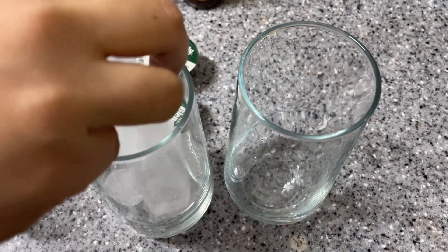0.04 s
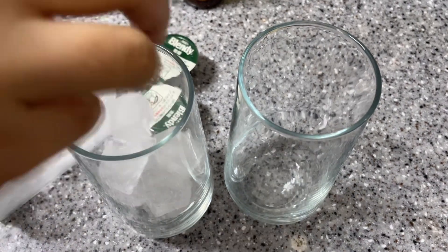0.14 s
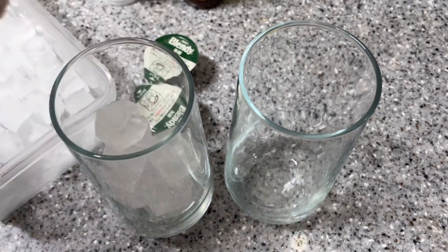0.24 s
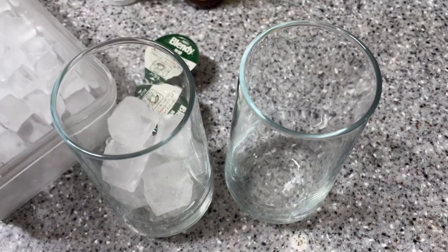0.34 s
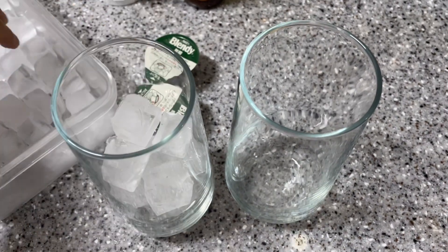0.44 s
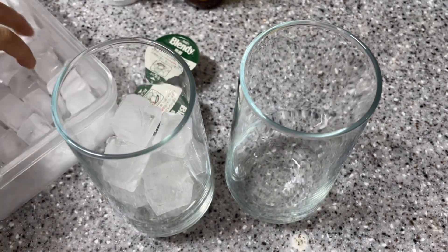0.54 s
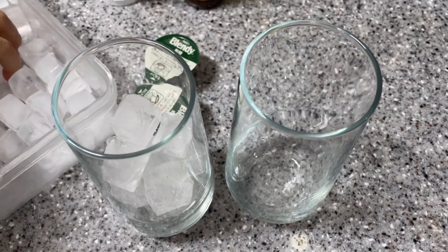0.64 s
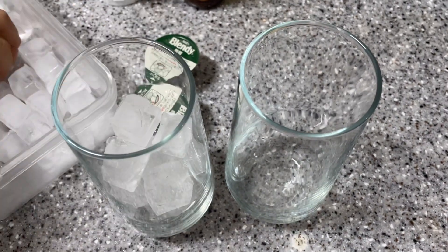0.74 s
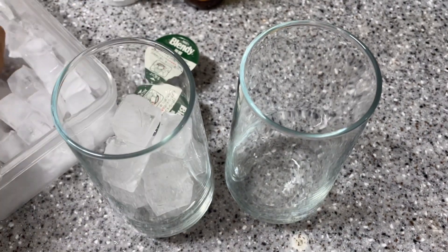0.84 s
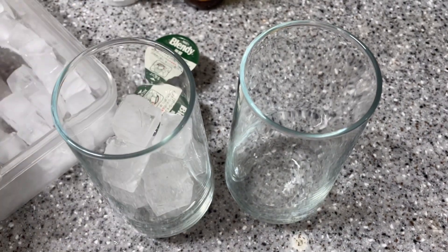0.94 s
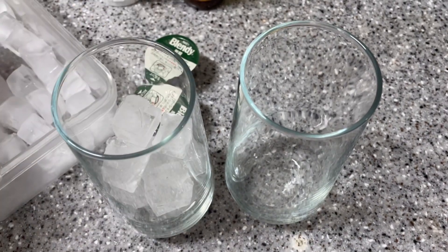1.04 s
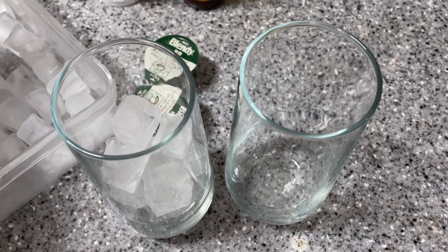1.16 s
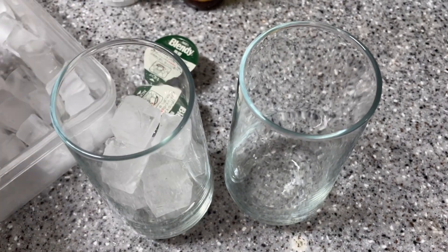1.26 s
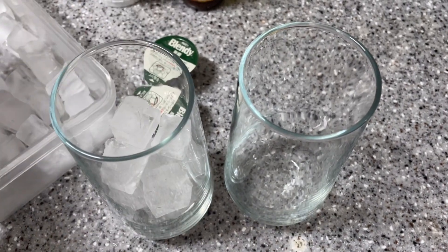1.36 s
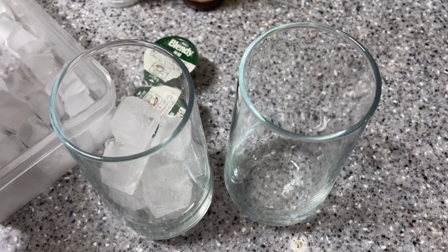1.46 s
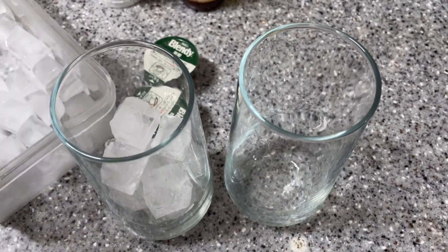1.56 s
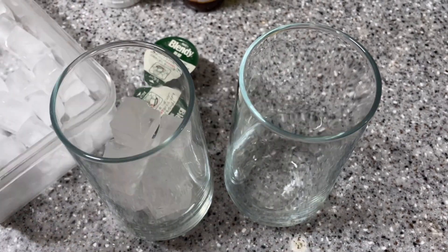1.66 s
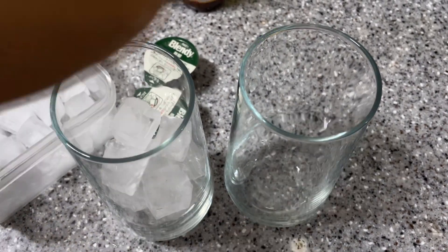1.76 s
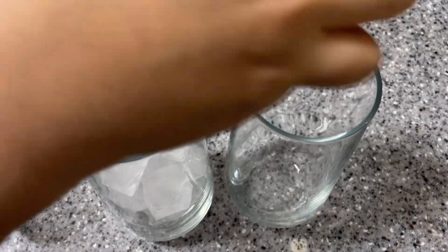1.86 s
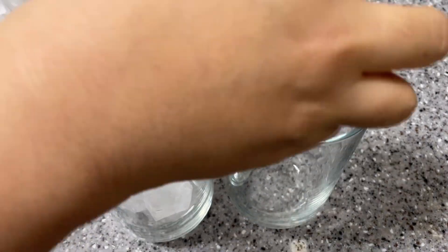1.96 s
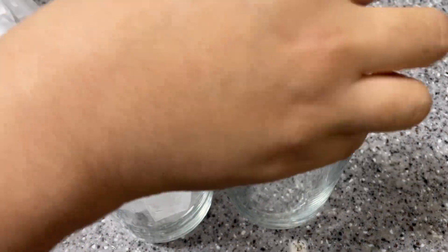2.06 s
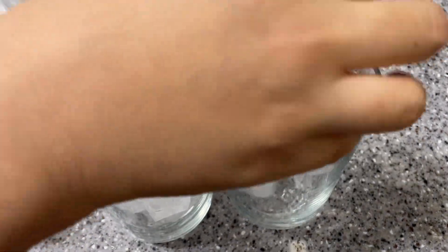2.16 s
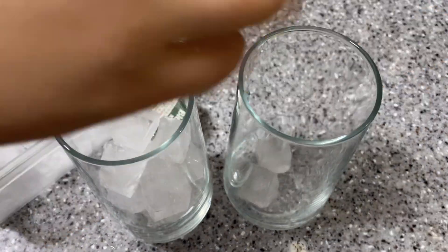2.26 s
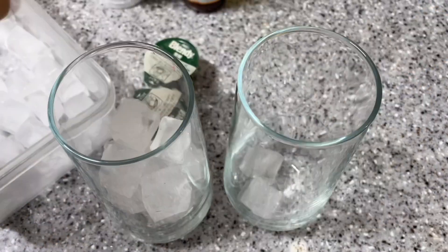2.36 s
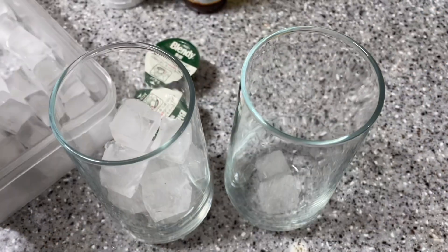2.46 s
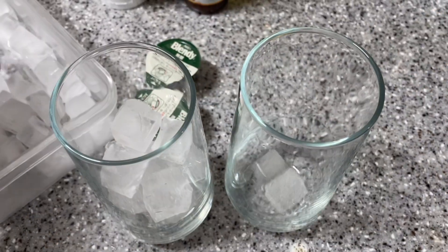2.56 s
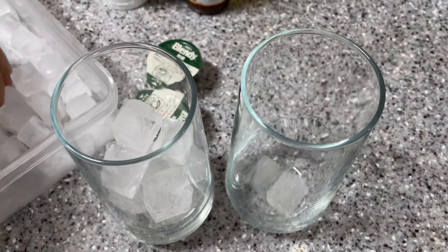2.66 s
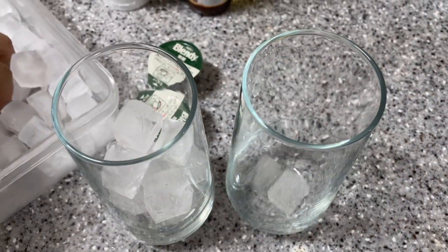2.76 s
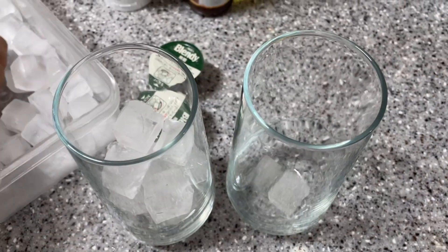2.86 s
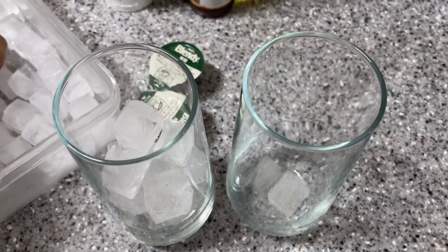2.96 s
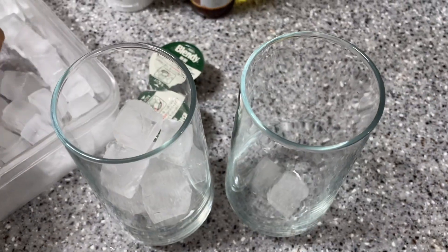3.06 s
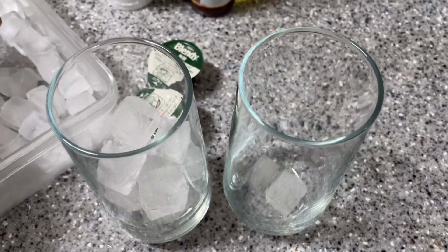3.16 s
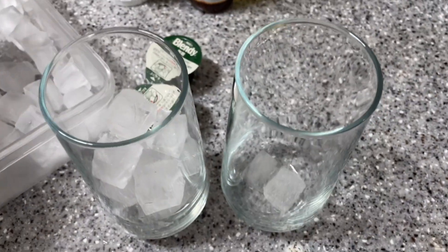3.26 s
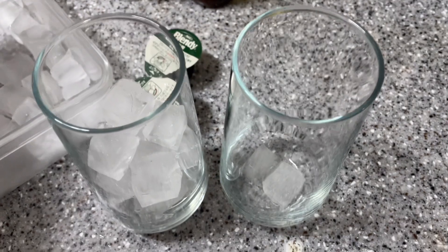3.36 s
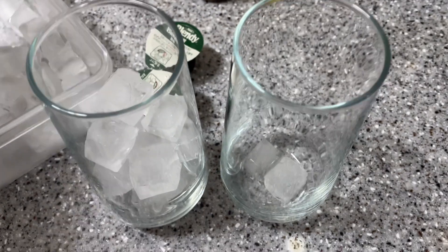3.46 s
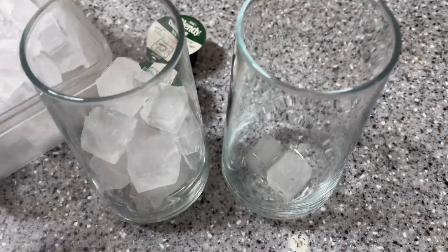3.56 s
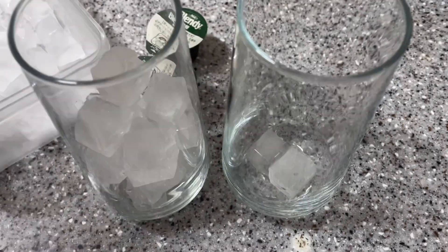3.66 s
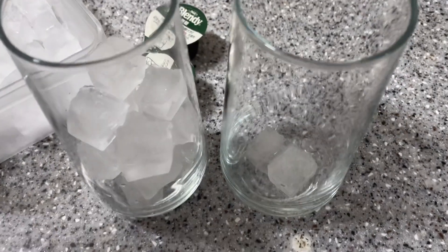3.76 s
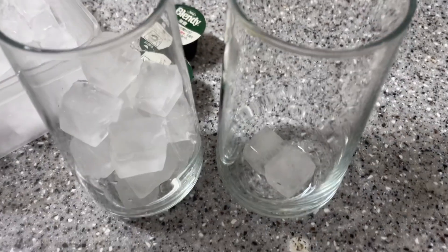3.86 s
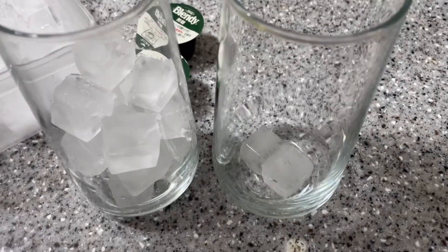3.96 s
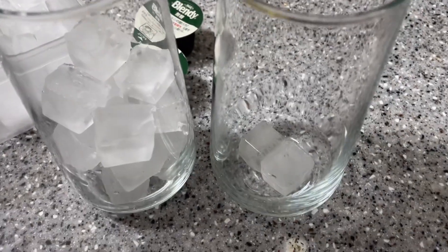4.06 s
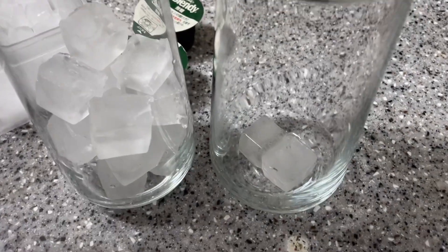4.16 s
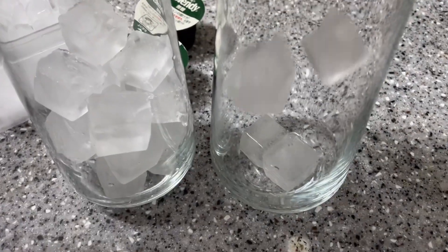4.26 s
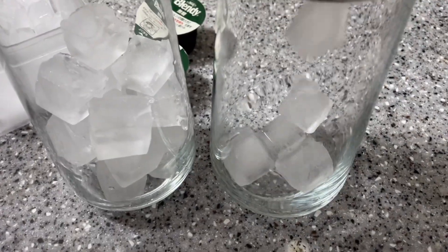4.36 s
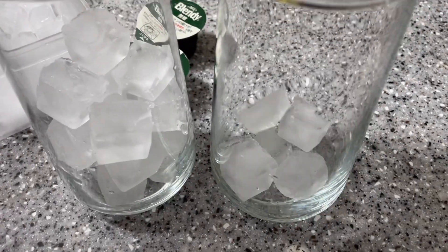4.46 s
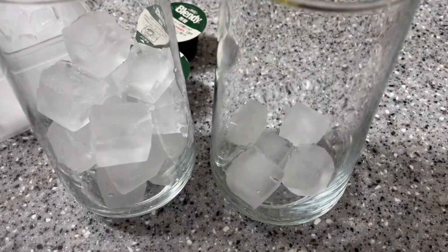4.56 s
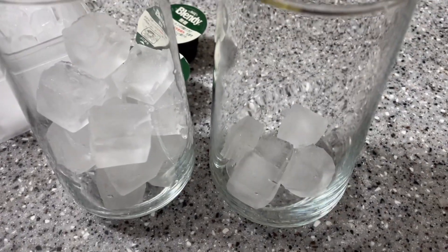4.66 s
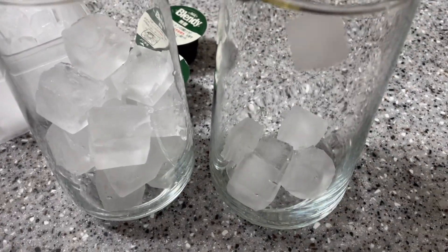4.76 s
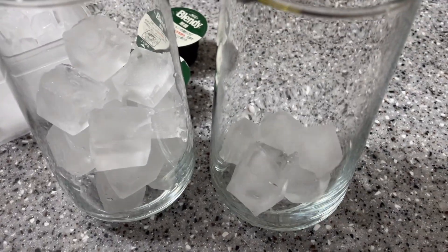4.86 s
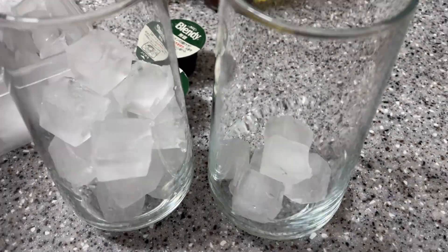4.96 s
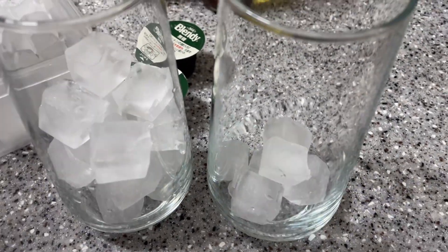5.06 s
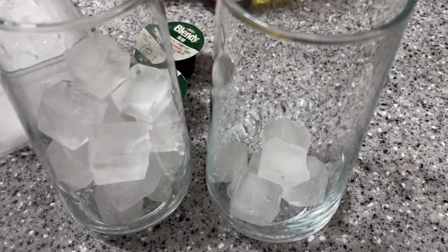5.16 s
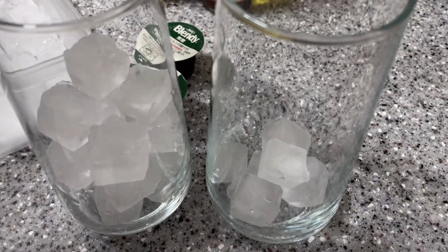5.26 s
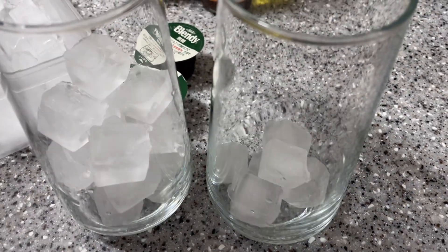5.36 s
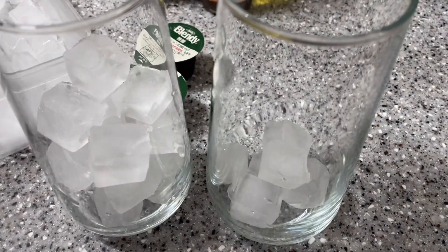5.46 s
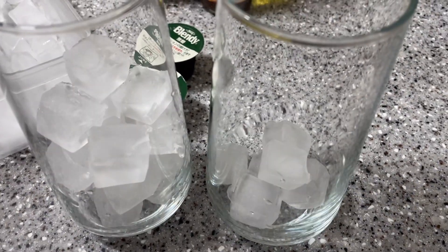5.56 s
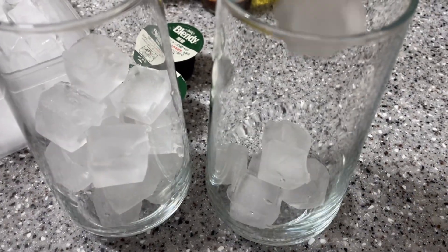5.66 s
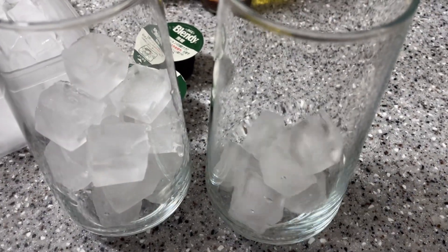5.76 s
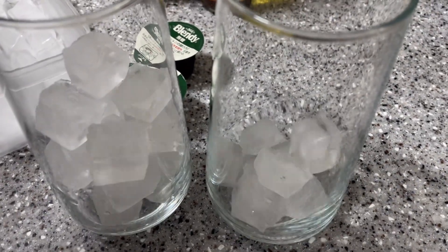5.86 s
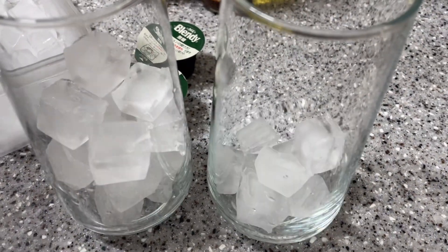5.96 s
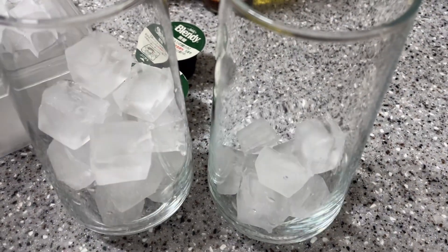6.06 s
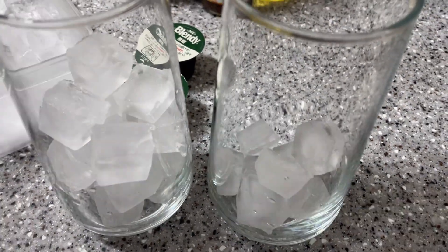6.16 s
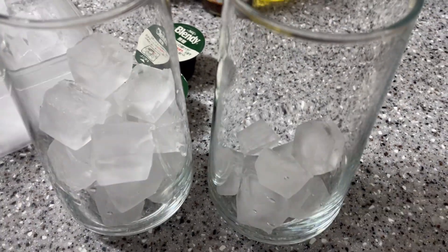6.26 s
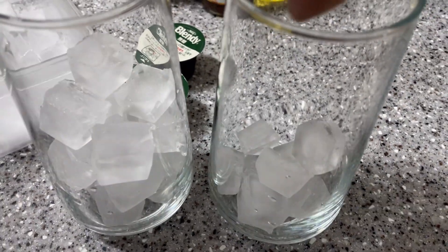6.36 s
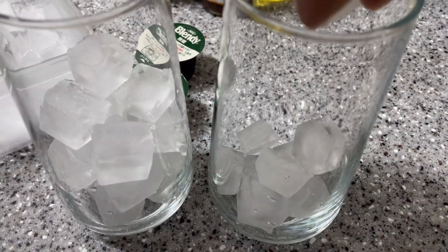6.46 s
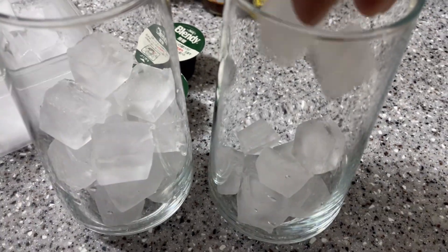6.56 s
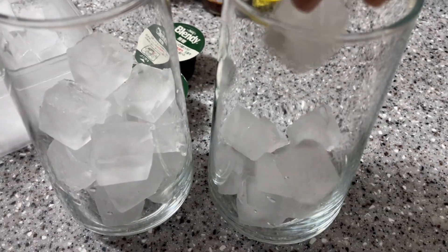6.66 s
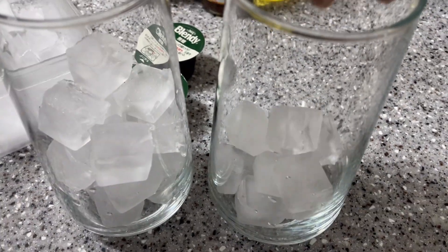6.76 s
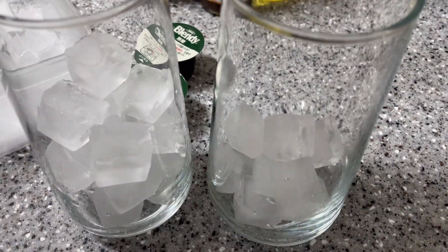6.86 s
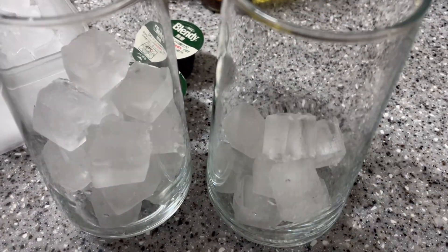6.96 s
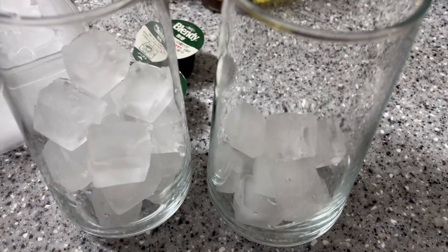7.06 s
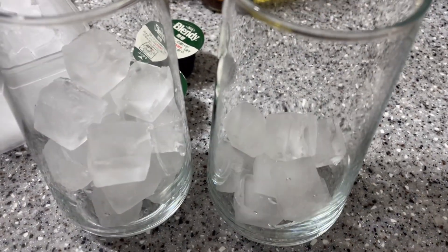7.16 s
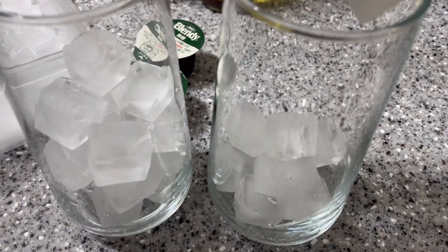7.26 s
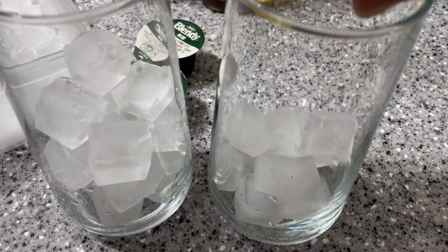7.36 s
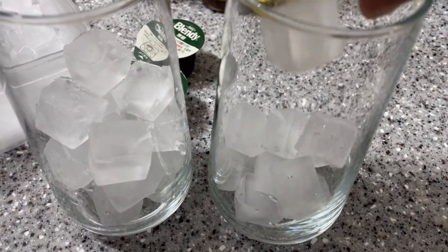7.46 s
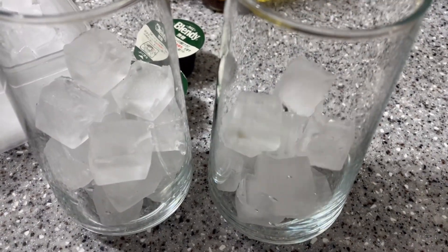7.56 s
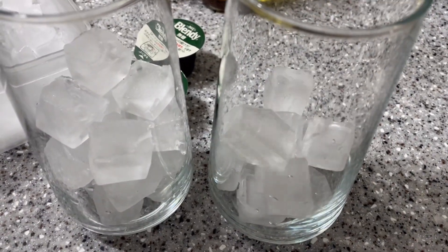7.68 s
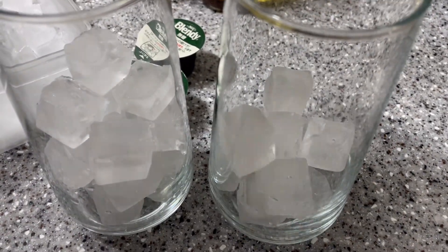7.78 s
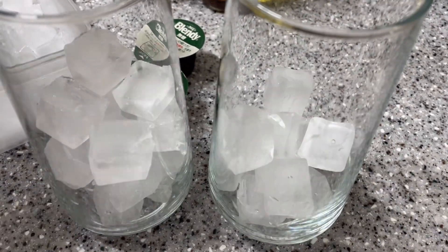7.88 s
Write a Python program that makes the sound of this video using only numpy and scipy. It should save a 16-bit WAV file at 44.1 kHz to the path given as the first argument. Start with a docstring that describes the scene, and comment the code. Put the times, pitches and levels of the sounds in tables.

```python
"""Ice cubes drop into a tall drinking glass on a stone counter, over a kitchen rush and hum.
A hand then digs cubes out of a plastic tub, and later handfuls fall into a second, right glass.
Knocks are decaying filtered noise, glass rings are sums of damped sine modes, and stirring is dense random ticks.
Reflections are added, and a close two-port microphone turns the phase between its ports."""
import sys
import numpy as np
from scipy import signal
from scipy.fft import rfft, irfft, next_fast_len
from scipy.io import wavfile
from scipy.ndimage import uniform_filter1d

SR = 44100
rng = np.random.default_rng(int(sys.argv[2]) if len(sys.argv) > 2 else 0)


def digitize_waveform(pressure):
    """Quantize a signal to 16-bit integers and store it at the path in sys.argv[1].

    Rows of a 2-D input are taken as channels; values are limited to [-1, 1].
    """
    field = np.atleast_2d(pressure).T
    bounded = np.clip(field, -1, 1)
    quanta = np.round(bounded * 32767).astype(np.int16)
    wavfile.write(sys.argv[1], SR, quanta)


N = 349272  # samples


def amp(db):
    """Decibel law: level in dB to amplitude gain."""
    return 10 ** (np.asarray(db) / 20)


def evened(x):
    """Power normalization: scales to rms 1."""
    return x / np.sqrt(np.mean(x ** 2) + 1e-20)


def smoothed(x, width, axis=-1):
    """Low-pass smoothing: two running means in a row."""
    return uniform_filter1d(uniform_filter1d(x, width, axis), width, axis)


def read(points, hz):
    """Spectral interpolation: reads a table on a log-frequency axis."""
    f, value = np.transpose(points)
    return np.interp(np.log(hz + 1), np.log(f + 1), value)


def at_time(points, s):
    """Linear interpolation: reads a table on a time axis."""
    return np.interp(s, *np.transpose(points))


def add(mix, s, sound):
    """Superposition: mixes a sound in at second s."""
    part = mix[:, round(s * SR):][:, :sound.shape[1]]
    part += sound[:, :part.shape[1]]


# background spectrum before levelling: (frequency [Hz], relative density [dB per Hz])
KITCHEN_SPECTRUM = [(25, -8), (42, -2), (60, 3), (72, 1.5), (100, -2.5), (250, -4.5), (600, -7),
                    (800, -8.5), (1200, -20), (2000, -24), (4300, -25), (5000, -29), (8000, -38),
                    (12000, -44.5), (13300, -51), (15500, -47)]
RUSH_DB, HUM_HZ, HUM_DB = -43.5, 119.4, -51.5  # rms of the rush; middle rms of the hum


def kitchen():
    """Broadband noise and a tone: appliance rush with drifting patches on two paths, and a wavering mains hum."""
    frames, hz = N // 256 + 5, np.fft.rfftfreq(1024, 1 / SR)
    a, b, c, d, patches = rng.standard_normal((frames, 513, 5)).T
    patches = uniform_filter1d(uniform_filter1d(patches, 10, 0), 16, 1)  # across frequency, then time
    colour_db = read(KITCHEN_SPECTRUM, hz)[:, None] + 2.9 * evened(patches)
    z = np.array([a + 1j * b, c + 1j * d]) * amp(colour_db)
    rush = amp(RUSH_DB) * evened(signal.istft(z, nperseg=1024, noverlap=768)[1][:, :N])
    waver = evened(smoothed(rng.standard_normal(N), 2500))
    hum = np.sqrt(2) * np.sin(2 * np.pi * HUM_HZ * np.arange(N) / SR)
    return rush + amp(HUM_DB + 3.7 * waver) * hum


# decay of the reflections: (frequency [Hz], t60 [s])
ROOM_DECAY = [(300, 0.1), (2000, 0.21), (6000, 0.15), (14000, 0.12)]


def room(x):
    """Reverberation: sparse reflections of random sign, each band dying at its own speed."""
    taps = np.zeros((2, SR // 2))
    slots = np.arange(200, SR // 2 - 20, 20)
    at = slots + rng.integers(0, 20, (2, len(slots)))
    np.put_along_axis(taps, at, rng.choice([-1., 1.], at.shape), 1)
    hz, t, z = signal.stft(taps, SR, nperseg=256)
    decay = amp(-60 * t / read(ROOM_DECAY, hz)[:, None])
    tail = signal.istft(z * decay, SR, nperseg=256)[1]
    return signal.fftconvolve(x[None], tail / np.linalg.norm(tail[0]), axes=1)[:, :N]


def burst(spectrum, t60, tilt_db=0., rise=0.0006, crack_db=-8.5, size=4096):
    """Damped impact noise: a coloured puff for each of two paths, with a bright crack; treble dies sooner than bass."""
    hz, t = np.fft.rfftfreq(size, 1 / SR), np.arange(size) / SR
    lumps = evened(smoothed(rng.standard_normal(len(hz)), 30))  # each burst has its own colour
    colour_db = read(spectrum, hz) + tilt_db * np.log2((hz + 50) / 3000) + 3.92 * lumps
    z = rfft(rng.standard_normal((2, size))) * amp(colour_db)
    low = 1 / (1 + (hz / 1500) ** 2)
    high = 1 / (1 + (7000 / (hz + 1)) ** 4)
    t60 = max(t60, .004)
    puff = irfft(z * low) * amp(-60 * t / (3.64 * t60))  # the bass lasts longer
    puff += irfft(z * (1 - low)) * amp(-60 * t / t60)
    puff += irfft(z * high) * amp(crack_db - 60 * t / 0.005)
    onset = 1 - np.exp(-t / max(rise, 1e-4))
    return puff * onset / (2.35 * np.std(irfft(z)))


# colour of the plastic tub, for stirring and clacks: (frequency [Hz], relative level [dB])
TUB_SPECTRUM = [(90, -38), (200, -46), (500, -11), (1200, -2.5), (2100, -3.5), (4100, -6.5), (6000, -15.5),
                (8000, -20), (11000, -25.5), (13200, -31.5), (15500, -32)]
# the hand stirs the heap of cubes, one list a stir: (time [s], relative rattle level [dB])
STIR_LEVELS = [
    [(.497, -40), (.555, -19.5), (.58, -15), (.645, -18), (.67, -27), (.76, -29), (.84, -19), (.87, -26.5),
     (.975, -38), (1.03, -30.5), (1.09, -35.5), (1.15, -32), (1.24, -34.5), (1.29, -47.5), (1.46, -57)],
    [(2.56, -47.5), (2.69, -15.5), (2.73, -29), (2.81, -16), (2.86, -15.5), (2.92, -23), (3.0, -20),
     (3.03, -32), (3.16, -27.5), (3.2, -40), (3.26, -47.5), (3.37, -23.5), (3.42, -43), (3.47, -32.5),
     (3.52, -87)],
    [(5.25, -58.5), (5.28, -24.5), (5.41, -40), (5.45, -34), (5.51, -42.5), (5.56, -38), (5.7, -65)],
    [(6.12, -57), (6.17, -26.5), (6.22, -28.5), (6.3, -41.5), (6.45, -57.5)],
]


def rattle(rows, per_s=1200, spread_db=5.5):
    """Random impact train: many small ticks, each shaking one patch of the tub wall; harder stirring is brighter."""
    s, level_db = np.transpose(rows)
    t = np.arange(s[0], s[-1], 1 / SR)
    strength = amp(spread_db * np.minimum(rng.exponential(1, len(t)), 4))
    ticks = strength * (rng.random(len(t)) < per_s / SR)
    patch = rng.integers(0, 12, len(t))

    def shaken(tilt_db):
        """Convolution: each patch answers its own ticks."""
        parts = (signal.oaconvolve(ticks[None] * (patch == k), burst(TUB_SPECTRUM, 0.031, tilt_db), axes=1)
                 for k in range(12))
        return evened(sum(part[:, :len(t)] for part in parts))

    dull, bright = shaken(-0.6), shaken(3.5)
    level_db = np.interp(t, s, level_db)
    brightness = np.clip((level_db + 60.5) / 40, 0, 1)
    sound = np.sqrt(1 - brightness) * dull + np.sqrt(brightness) * bright
    return amp(level_db) * sound * signal.windows.tukey(len(t), .01)


# single cubes clacking in the tub: (time [s], relative level [dB])
CLACK_HITS = [(0.5041, -13), (0.5863, -4.5), (.609, -5.5), (0.7768, -9.5), (0.8032, -24), (0.8374, 4),
              (0.888, -6), (0.9852, -14), (1.0154, -7.5), (1.1147, -10.5), (1.128, -5), (1.1575, -3.5),
              (1.2165, -12), (2.5992, -18), (2.6821, -11), (2.7767, -31), (2.8256, -3.5), (2.8882, -1.5),
              (3.0584, -9.5), (3.0988, -11.5), (3.1517, -11), (3.285, -24), (3.3191, -9.5), (3.3447, 1),
              (3.385, -4.5), (3.4283, -16.5), (3.4523, -8), (5.2719, 5), (5.3073, -8.5), (5.3203, -13.5),
              (5.374, -24), (5.432, -1), (5.4574, -26), (5.5249, -10), (5.5433, -11), (5.6175, -27.5),
              (6.1415, -12.5), (6.1696, 0.5), (6.1995, -4), (6.2394, -36), (6.2754, -18), (6.3607, -30)]
# brightness of the clacks: (time [s], spectral tilt [dB per octave])
CLACK_TILTS = [(.5, 4), (1.2, 3.5), (2.7, 2.5), (3.4, 4), (5.3, 4), (5.6, 4), (6.2, 3.5), (6.35, 12.5)]
CLACK_T60_S, SHARPER_DB_PER_DB = 0.04, 0.32  # t60 of a clack at 0 dB; harder clacks die sooner


def tub():
    """Impact excitation: stirring of the heap and single clacks."""
    out = np.zeros((2, N))
    for rows in STIR_LEVELS:
        add(out, rows[0][0], rattle(rows))
    for s, db in CLACK_HITS:
        t60 = CLACK_T60_S * amp(-SHARPER_DB_PER_DB * db)
        clack = burst(TUB_SPECTRUM, t60, at_time(CLACK_TILTS, s), rise=0.00067)
        add(out, s, amp(db) * clack)
    return out


def ring(modes, length=0.96, rise=.001, scatter_db=3.0):
    """Modal synthesis: damped sines on two paths, t60 scaled by length; random mode balance as the struck spot varies."""
    hz, mode_db, t60 = np.transpose(modes)[:, :, None]
    t60 = t60 * max(length, .05)
    t = np.arange(0, min(t60.max(), .7), 1 / SR)
    spot_db, start = scatter_db * rng.standard_normal(hz.shape), rng.random(hz.shape)
    start = start + np.array([0, 1 / 4])[:, None, None]  # the second path is a quarter turn apart in phase
    tones = amp(mode_db + spot_db - 60 * t / t60) * np.sin(2 * np.pi * (hz * t + start))
    onset = 1 - np.exp(-t / max(rise, 1e-4))
    return onset * tones.sum(1) / np.linalg.norm(amp(mode_db))


# heavy landings: (time [s], level [dB])
THUMP_HITS = [(2.141, -18.5), (2.217, -15.5), (2.285, -23.5), (4.309, -27), (5.727, -16.5), (6.621, -28),
              (6.729, -28), (7.355, -27), (7.514, -25), (7.596, -26)]
# modes of the counter and air column: (frequency [Hz], relative level [dB], t60 before the scaling in ring [s])
THUMP_MODES = [(568, 3, 0.23), (236, 1, 0.08), (341.4, 3, 0.028), (684, 4, 0.11), (925, -20.5, 0.028)]


def thumps():
    """Low-frequency resonance: heavy landings thump the counter and air column."""
    out = np.zeros((2, N))
    for s, db in THUMP_HITS:
        add(out, s, amp(db) * ring(THUMP_MODES, rise=0.0011))
    return out


# the ringing stops short: (time [s], level lost [dB]; negative rows have no effect)
HUSH_STEPS = [(0.202, 7.5), (2.284, -2), (2.501, -3), (4.309, 13.5), (4.991, 44.5), (6.621, 8.5),
              (6.81, 5.5), (7.355, 4), (7.406, 26), (7.62, 8)]


def hushes():
    """Cumulative attenuation: dB lost up to each sample."""
    lost_db = np.zeros(N + SR)
    for s, db in HUSH_STEPS:
        lost_db[round(s * SR):] += max(db, 0)
    return lost_db


def long_note(s, hz, db, t60, hushed_db):
    """Lightly damped resonance: one slow mode of the right glass, cut at 0.7 s at most, lowered only by a hush."""
    note, at = ring([(hz, 0, t60)], rise=0.0021, scatter_db=-0.5), round(s * SR)
    return note * amp(db + hushed_db[at] - hushed_db[at:at + note.shape[1]])


# blows that set the low rim note singing: (time [s], level [dB])
LOW_NOTE_HITS = [(4.159, -35.5), (4.36, -35), (4.817, -44), (5.749, -44), (6.539, -31), (6.634, -24.5),
                 (6.731, -31), (7.281, -33.5), (7.374, -30), (7.597, -28)]
# t60 before the scaling in ring; it shortens as the glass fills
LOW_HZ, LOW_T60_S, LOW_FREE_S, LOW_DAMP_DB_PER_S = 1283, 2.4, 4.8, 8.5


def low_notes(hushed_db):
    """Added damping: long rim notes of the right glass, not muted by a passing cube, shorter as cubes pile up."""
    out = np.zeros((2, N))
    for s, db in LOW_NOTE_HITS:
        t60 = LOW_T60_S * amp(-LOW_DAMP_DB_PER_S * max(s - LOW_FREE_S, 0))
        add(out, s, long_note(s, LOW_HZ, db, t60, hushed_db))
    return out


# level against the base modes, t60 before the scaling in ring; fainter as the glass fills
FOOT_HZ, FOOT_DB, FOOT_T60_S, FOOT_FREE_S, FOOT_LOSS_DB_PER_S = 2930, -14, 0.32, 1.8, 12


def foot(s, base_db, hushed_db):
    """Mode coupling: the foot of the right glass sounds with its base modes."""
    foot_db = base_db + FOOT_DB - FOOT_LOSS_DB_PER_S * max(s - FOOT_FREE_S, 0)
    return long_note(s, FOOT_HZ, foot_db, FOOT_T60_S, hushed_db)


# colour of the dry knock of ice: (frequency [Hz], relative level [dB])
ICE_SPECTRUM = [(120, -36), (300, -3.5), (800, -2.5), (1600, -1), (2600, -2.5), (5000, 2.5), (7500, -2),
                (11000, -15), (13500, -18.5), (15500, -24.5)]
KNOCK_TILT_DB, KNOCK_TILT_RISE_DB = -.5, 2  # dB an octave for a blow at the base, and gained up to the rim


def knock(height, rise):
    """Contact noise: a short ice burst, brighter for a blow nearer the rim."""
    tilt_db = KNOCK_TILT_DB + KNOCK_TILT_RISE_DB * height
    return burst(ICE_SPECTRUM, 0.033, tilt_db, rise=0.58 * rise, crack_db=-3.5)


def chatter(blow, chatter_db, chatter_s):
    """Repeated impact: eight small bounces follow a blow, fainter the later."""
    late, sign = rng.random(8), rng.choice([-1., 1.], 8)
    bounces = np.zeros(2048)
    at = np.minimum(late * chatter_s * SR, 2047).astype(int)
    bounces[at] = sign * amp(chatter_db - 18.7 * late)
    bounces[0] = 1  # the blow itself
    return signal.oaconvolve(blow, bounces[None] / np.linalg.norm(bounces), axes=1)[:, :SR // 2]


# cubes landing in a glass:
# (time [s], dry knock of ice [dB], ring of the wall [dB], height of the blow [0 base - 1 rim])
CUBE_DROPS = [(0.0399, -13, -17, 0.3), (0.0605, -2, -12, 0.44), (0.0888, -6.5, -8.5, 0.5),
              (0.1164, -3, -5, 0.28), (0.1243, -9, -0.5, 0.43), (0.1499, -12, -14, 0.44),
              (.1674, -39, -23, .7), (.1999, -16, -17, 0.46), (0.269, -34, -50, .1),
              (0.2859, -27, -61, 0.097), (.3077, -33, -59, 0.09), (0.3237, -24.5, -52, 0.41),
              (0.3358, -16.5, -16, 0.19), (.351, -24, -25, .3), (0.3567, -18, -13, 0.27),
              (2.133, -17, -35, .1), (2.141, 0, -17.5, 0.42), (2.1824, -12, -33, 0.71),
              (2.2161, -12, -32, 0.21), (2.2506, -16.5, -42, 0.23), (2.2867, -9.5, -33, 0.098),
              (2.319, -11.5, -47, 0.38), (2.34, -24, -33, 0.47), (2.362, -15.5, -49, .2),
              (2.4113, -18.5, -29.5, 0.23), (2.434, -21, -42, 0.25), (2.463, -12.5, -42, .4),
              (4.1601, -17, -8.5, 0.5), (4.2104, -23, -13, 0.68), (4.2814, -28, -42, 0.81),
              (4.3093, 0.5, -9.5, 0.55), (4.3188, -8, -5.5, 0.14), (4.3425, -21, -17.5, 0.5),
              (4.397, -20.5, -36, 0.36), (4.412, -15.5, -12, 0.23), (4.447, -24, -44, 0.34),
              (4.4846, -27, -33, 0.48), (4.5045, -17, -22, 0.42), (4.572, -24.5, -26, 0.22),
              (4.602, -23, -31, 0.07), (4.8167, -6, -8.5, 0.37), (4.8556, -14, -27, 0.16),
              (4.9043, -19, -27.5, 0.24), (4.9463, -15.5, -34, 0.35), (4.9601, -21, -20.5, 0.085),
              (4.9871, -16, -30, 0.06), (5.7268, -0.5, -17, 0.43), (5.749, -7.5, -9, 0.34),
              (5.8055, -27, -26, 0.11), (5.8374, -31, -24, 0.37), (5.8898, -31, -40, 0.59),
              (5.957, -51, -45.5, 0.2), (6.538, -12, -18.5, 0.81), (6.621, -2, -18, 0.13),
              (6.6329, -4, -6, 0.26), (6.657, -14, -4.5, .2), (6.6743, -21.5, -7.5, .2),
              (6.7122, -23, -27, 0.42), (6.7307, -14, -14.5, 0.35), (6.753, -26, -14, 0.28),
              (6.7924, -25, -31, 0.36), (7.2801, -17, -3, 0.58), (7.3569, -9, -28, 0.42),
              (7.3734, -14.5, -0.5, 0.5), (7.5155, -4, -22, 0.16), (7.5285, -33, -11, .4),
              (7.558, -17, -46, .7), (7.5726, -12, -16, 0.69), (7.5818, -10, -4.5, 0.41),
              (7.5935, -9.5, -26, 0.83), (7.716, -27.5, -33.5, 0.48), (7.7485, -27.5, -63, 0.34),
              (7.775, -25.5, -54, 0.32), (7.83, -44, -30, .1)]
# level of the high ring: (time [s], gain [dB])
HIGH_GAINS = [(.1, 0.5), (.35, -1), (2.3, -2.5), (4.2, -2), (4.5, 2.5), (4.9, -2), (5.8, 2), (6.6, 2.5),
              (7.3, 7.5), (7.6, 9.5)]
# blow-to-blow spread of the mode levels: (wall [dB], high [dB], base [dB])
MODE_SCATTER = (2.5, 5.5, 2.5)
RIGHT_FROM_S, SECOND_HANDFUL_S = 1, 3  # the hand moves on to the right glass; its foot gets covered
RIM_DB, RIM_RISE_DB = -29, 40.5  # rim modes against the wall ring for a blow at the base, and gained up to the rim
BASE_DB, BASE_FALL_DB = -0.5, 27  # base modes against the knock for a blow at the base, and lost up to the rim
EMPTY_BASE_DB = -5  # the short base modes speak less while the foot still rings freely
HIGH_DB, HIGH_FROM_KNOCK, HIGH_RISE_DB = -12, 0.48, 6.5  # blend of knock and wall level, stronger up the wall
SHORTEN_PER_DB = 0.0258  # a cube that slaps the wall stays on it and shortens the ring
FULL_FROM_S, DAMP_DB_PER_S = 5.96, 4.5  # from here the heap of cubes shortens the mode families
MUTE_DB_PER_DB, MUTE_AT_DB = 1.1, -8  # a heavier cube mutes more than one of this strength
RIM_MUTED = .4  # share of a cube's muting that reaches the rim modes


def muting(drops, mute_db):
    """Contact damping: dB that the touch of each cube takes from earlier ringing, summed up to each sample."""
    muted_db = np.zeros(N + SR)
    for s, knock_db, wall_db, _ in drops:
        excess_db = max(knock_db, wall_db) - MUTE_AT_DB
        muted_db[round(s * SR):] += max(mute_db + MUTE_DB_PER_DB * excess_db, 0)
    return muted_db


def glass(families, right, length, rise, mute_db, chatter_db, chatter_s):
    """Modal excitation: each cube knocks, rings the mode families by the height of its blow and chatters on."""
    drops = [row for row in CUBE_DROPS if (row[0] > RIGHT_FROM_S) == right]
    out, hushed_db, muted_db = np.zeros((2, N)), hushes(), muting(drops, mute_db)
    rim_modes, *body_modes = families
    for s, knock_db, wall_db, height in drops:
        height = np.clip(height, 0, 1)
        rim_db = wall_db + RIM_DB + RIM_RISE_DB * height
        base_db = knock_db + BASE_DB - BASE_FALL_DB * height
        high_db = HIGH_DB + HIGH_FROM_KNOCK * knock_db + (1 - HIGH_FROM_KNOCK) * wall_db
        high_db += HIGH_RISE_DB * height + at_time(HIGH_GAINS, s)
        foot_free = right and s < SECOND_HANDFUL_S
        short_base_db = base_db + EMPTY_BASE_DB * foot_free

        free = length * (1 - SHORTEN_PER_DB * max(wall_db - knock_db, 0))
        free *= amp(-DAMP_DB_PER_S * max(s - FULL_FROM_S, 0))
        at = round(s * SR)
        lost_db, hush_db = (v[at:at + SR // 2] - v[at] for v in (muted_db, hushed_db))

        blow = np.zeros((2, SR // 2))
        for db, modes, scatter_db in zip((wall_db, high_db, short_base_db), body_modes, MODE_SCATTER):
            add(blow, 0, amp(db) * ring(modes, free, rise, scatter_db))
        add(blow, 0, amp(knock_db) * knock(height, rise))
        blow = chatter(blow, chatter_db, chatter_s)
        add(out, s, blow * amp(-lost_db - hush_db))

        rim = amp(rim_db) * ring(rim_modes, free, rise)[:, :SR // 2]
        add(out, s, rim * amp(-RIM_MUTED * lost_db - hush_db)[:rim.shape[1]])
        if right:
            add(out, s, foot(s, base_db, hushed_db))
    if right:
        out += low_notes(hushed_db)
    return out


# modes of each glass in four families (rim, wall, high, base):
# (frequency [Hz], relative level [dB], t60 before the length scaling [s])
LEFT_MODES = [
    [(3600, 0.5, 0.22), (3930, -2, 0.22), (6710, -0.5, 0.16)],
    [(5200, 1.5, 0.036), (5480, 4, 0.046), (4520, -7, 0.045), (3770, -13, 0.072), (5560, -31, 0.025)],
    [(7500, 1, .06), (8750, 0, 0.059), (10140, -2, 0.065), (10800, 7, 0.036), (11380, -2, 0.05),
     (11300, -1, 0.044), (11500, -10, 0.044), (12900, -6, 0.041), (15100, -21, .04)],
    [(2490, 10, 0.059), (2900, -25, .1), (2040, -11, 0.048), (1332, 1.5, 0.15)],
]
RIGHT_MODES = [
    [(3390, -4.5, 0.37), (6310, -2, 0.12)],
    [(4938, -3, 0.15), (5280, -4.5, 0.1), (4730, -13.5, 0.11), (5367, 0.5, 0.11), (5690, -4.5, 0.047),
     (3910, -10.5, 0.052)],
    [(7330, 12.5, 0.024), (8800, 8.5, 0.18), (9350, -6.5, 0.048), (9700, 6, 0.07), (10020, -7, 0.097),
     (11100, -12.5, .06), (10470, -5, 0.092), (11080, 7.5, 0.066), (12000, 0, 0.14), (11970, -10, 0.11),
     (13400, -23.5, .06), (14400, -4.5, 0.066), (15500, -11, 0.078)],
    [(2574, -5, 0.046), (1753, -10, 0.038), (1977, -32, 0.02)],
]


def scene():
    """Superposition of sources: row 0 is shared by both ports, row 1 reaches the right port by another path."""
    glasses = glass(LEFT_MODES, False, length=0.47, rise=0.00049, mute_db=-1.0, chatter_db=-2.0, chatter_s=.025)
    glasses += glass(RIGHT_MODES, True, length=0.83, rise=0.00037, mute_db=22.0, chatter_db=-7.5, chatter_s=.035)
    glasses += thumps()
    heap = tub()
    reflections = room(amp(-16.5) * glasses[0] + amp(-11.5) * heap[0])
    return glasses + heap + reflections + kitchen()


# how alike the microphone ports are: (frequency [Hz], likeness [0-1])
PORT_LIKENESS = [(60, .995), (300, 0.98), (1000, 0.24), (1900, 0.85), (2800, 0.24), (4600, 0.3),
                 (5600, 0.84), (7500, 1), (9300, 0.86), (11000, 1), (12900, 0.43), (14300, 1)]
# phase by which the right port leads: (frequency [Hz], lead [rad])
PORT_LEAD = [(0, 0), (300, .1), (900, 1.1), (1500, -.2), (4900, 0), (7650, -3.14), (11000, -6.28),
             (14300, -9.42), (16000, -10.5)]
PORT_HZ, EDGE_HZ = 15850, 17100  # start of the port roll-off; band limit


def record(dry):
    """Interaural-style coherence and phase: the ports differ, then roll off, overload softly and are band limited."""
    size = next_fast_len(N + 4096)
    hz = np.fft.rfftfreq(size, 1 / SR)
    shared, other = rfft(dry, size)
    alike = np.clip(read(PORT_LIKENESS, hz), 0, 1)
    turn = np.exp(.5j * at_time(PORT_LEAD, hz))  # half the lead on each port
    right = alike * shared + np.sqrt(1 - alike ** 2) * other
    pair = np.array([shared / turn, right * turn])
    pair *= amp(-.045 * np.maximum(hz - PORT_HZ, 0))  # dB per Hz
    pair *= 1 / (1 + (36 / (hz + 1)) ** 4)  # the capsule loses the deepest bass
    soft = 1.1 * np.tanh(irfft(pair, size)[:, :N] / 1.1)  # the loudest blows are rounded off
    band = signal.firwin(511, EDGE_HZ, window=("kaiser", 13), fs=SR)
    return signal.oaconvolve(soft, band[None], "same")


dry = scene()
out = record(dry)
digitize_waveform(out)
```